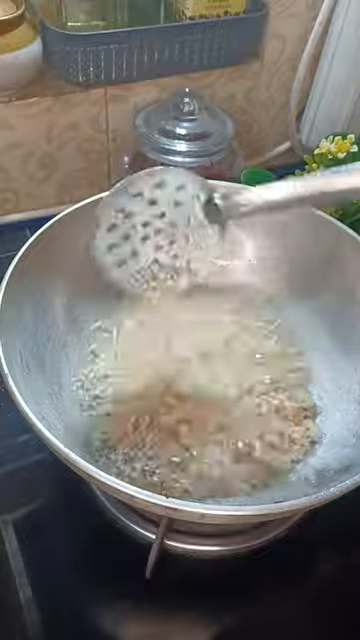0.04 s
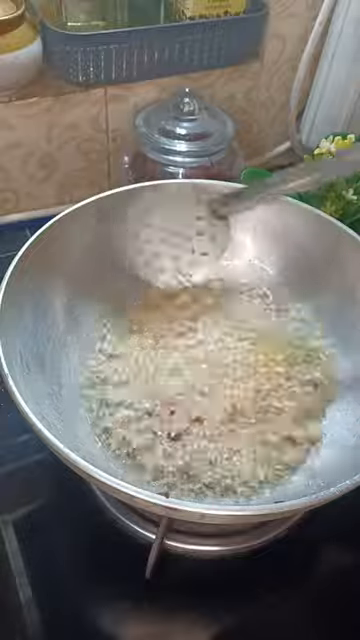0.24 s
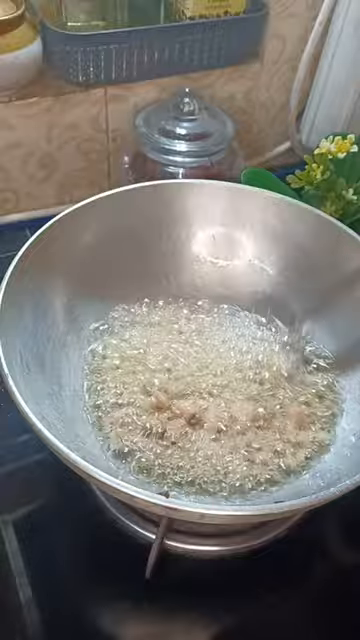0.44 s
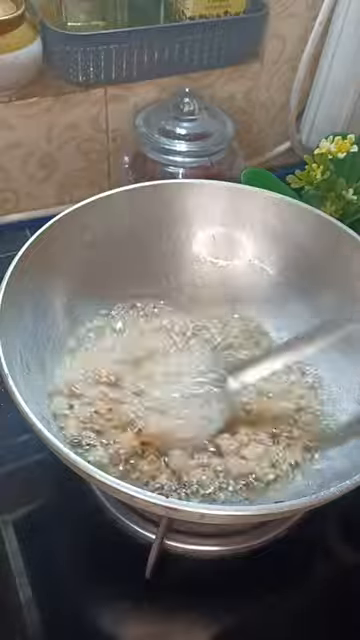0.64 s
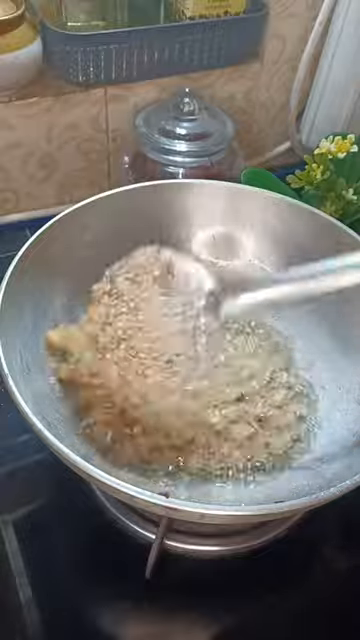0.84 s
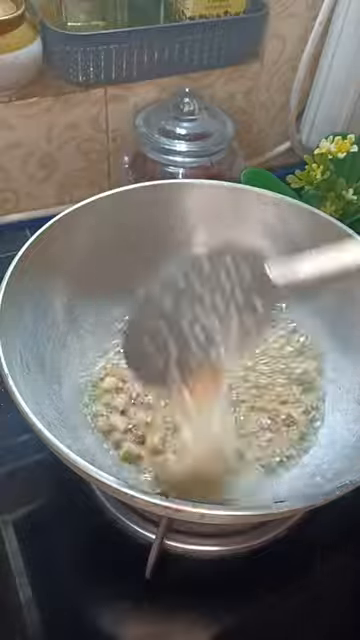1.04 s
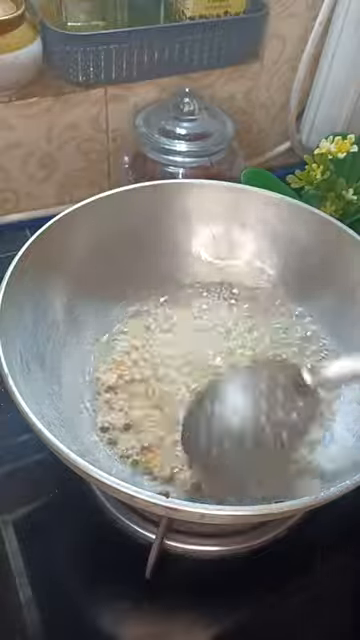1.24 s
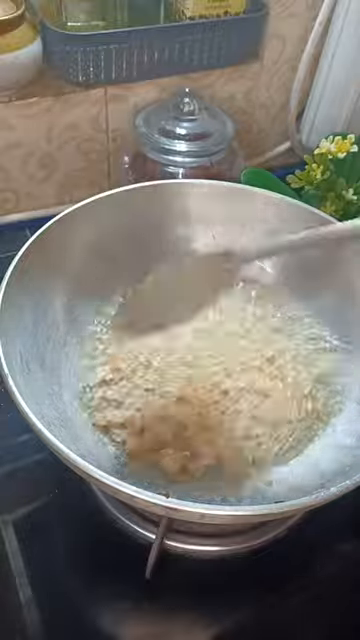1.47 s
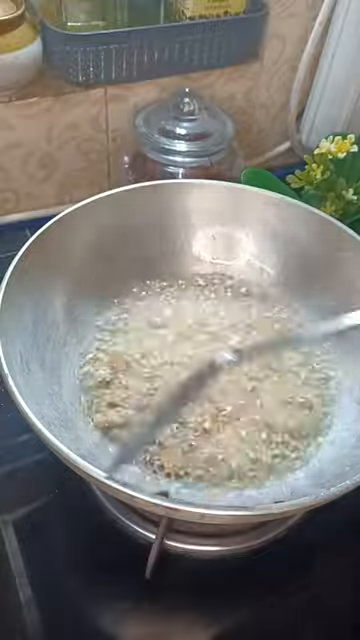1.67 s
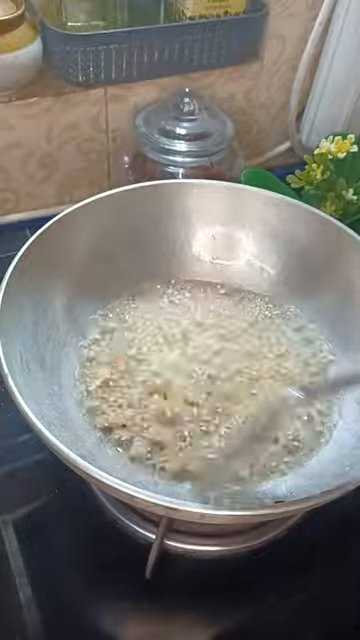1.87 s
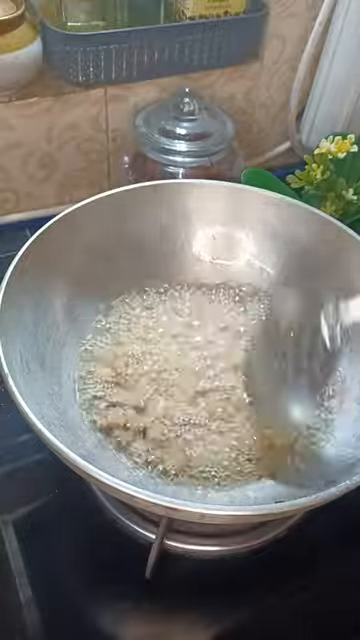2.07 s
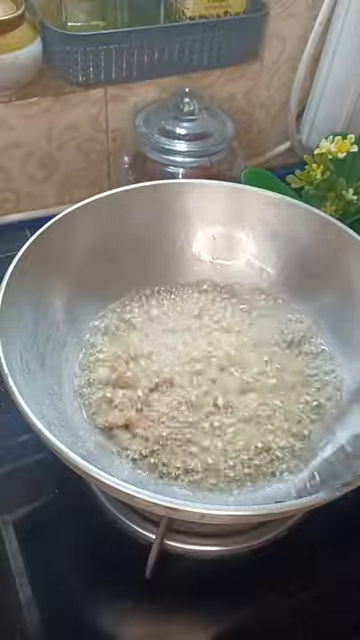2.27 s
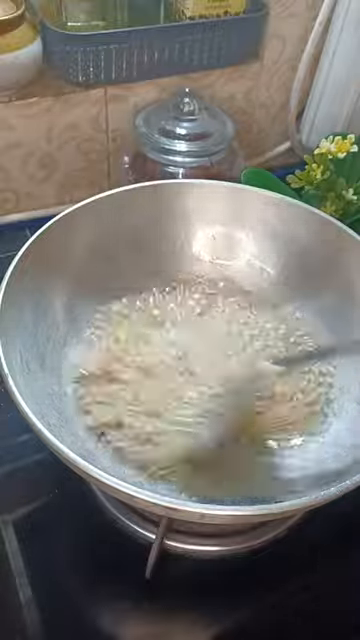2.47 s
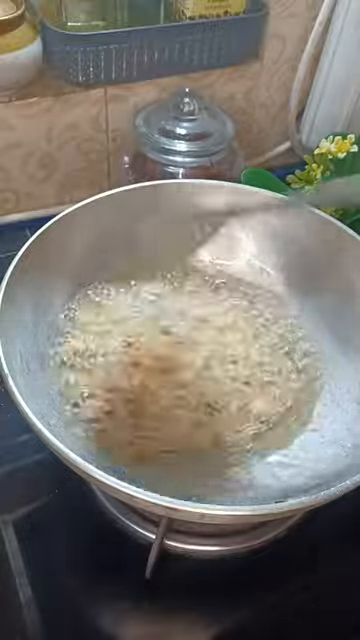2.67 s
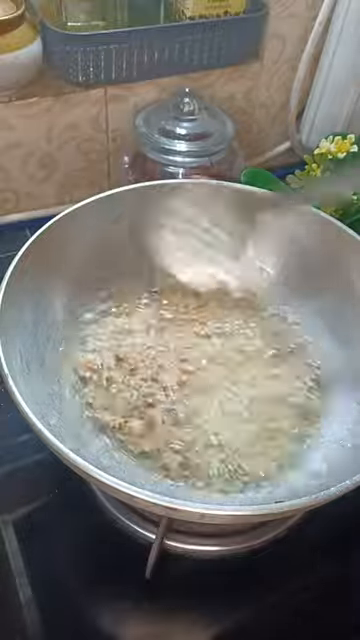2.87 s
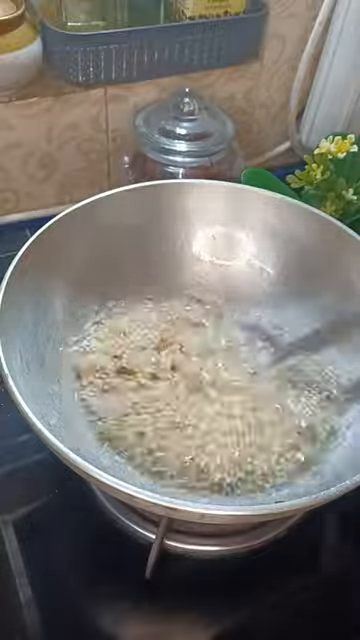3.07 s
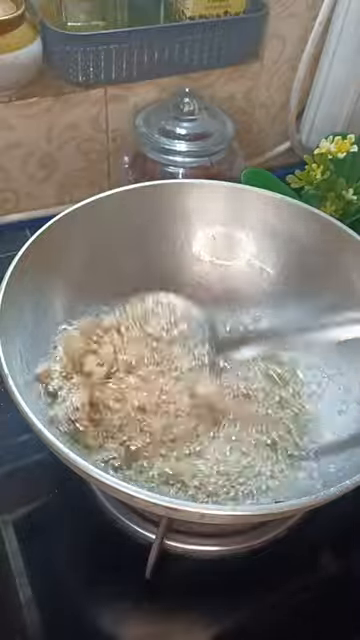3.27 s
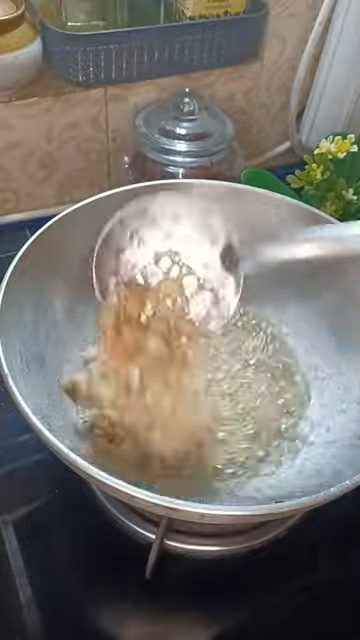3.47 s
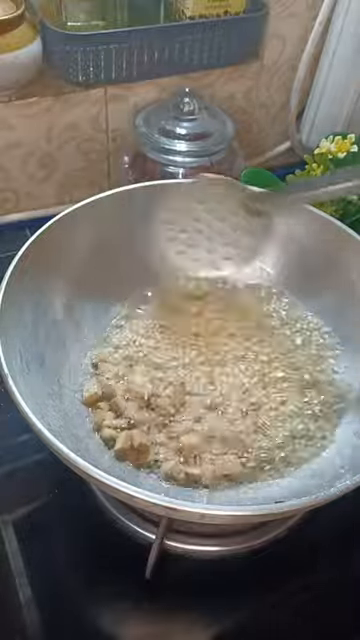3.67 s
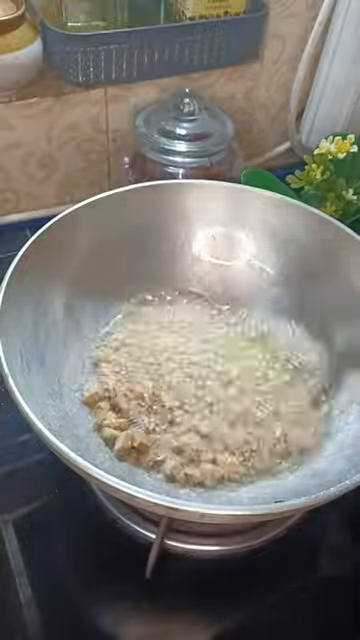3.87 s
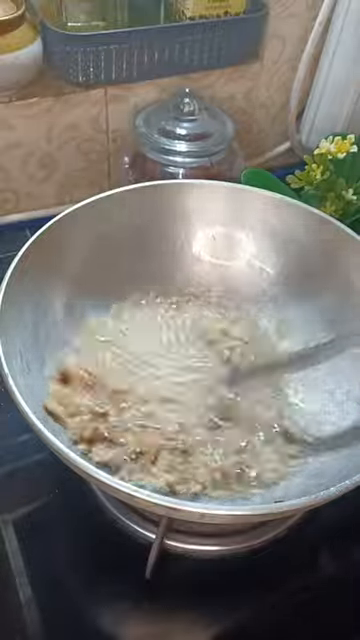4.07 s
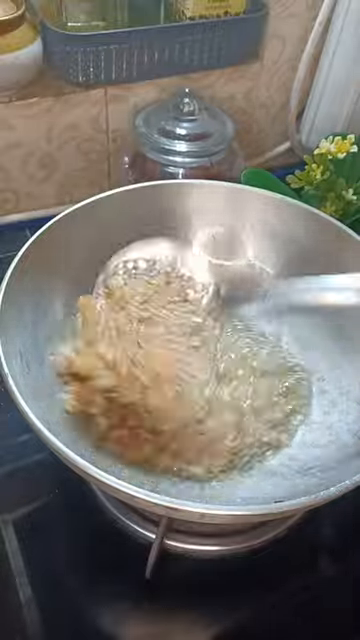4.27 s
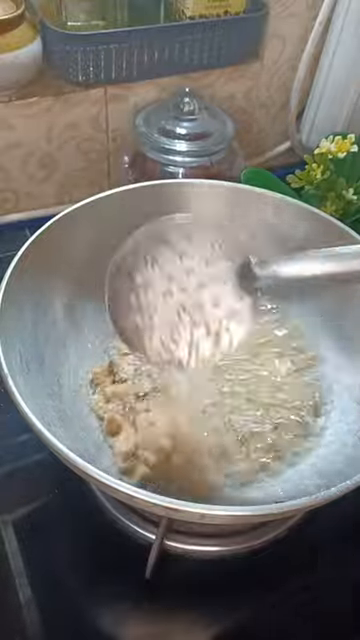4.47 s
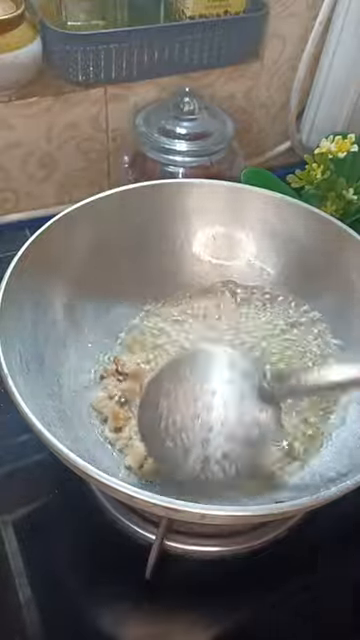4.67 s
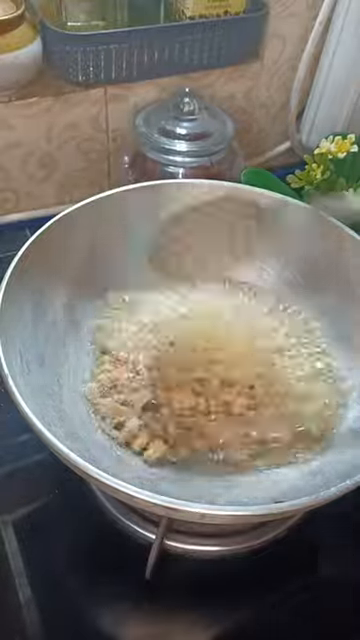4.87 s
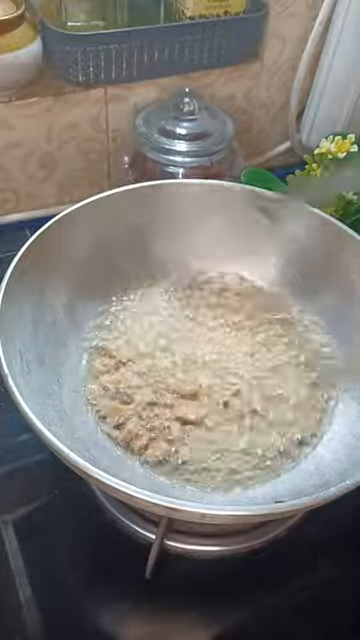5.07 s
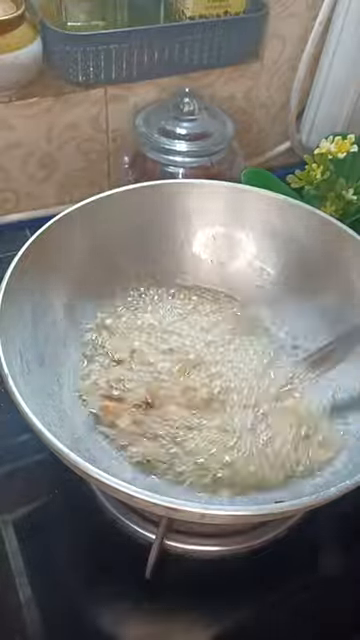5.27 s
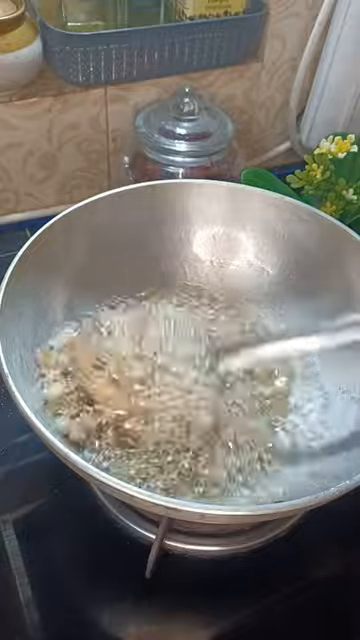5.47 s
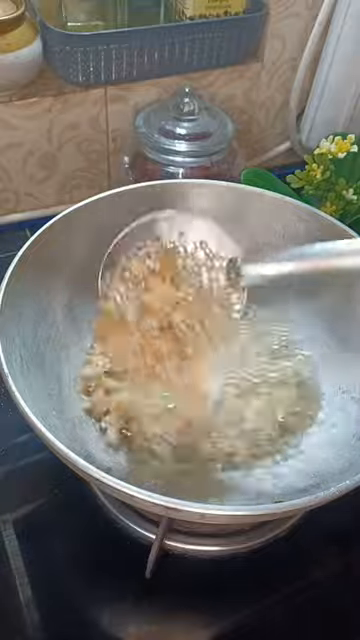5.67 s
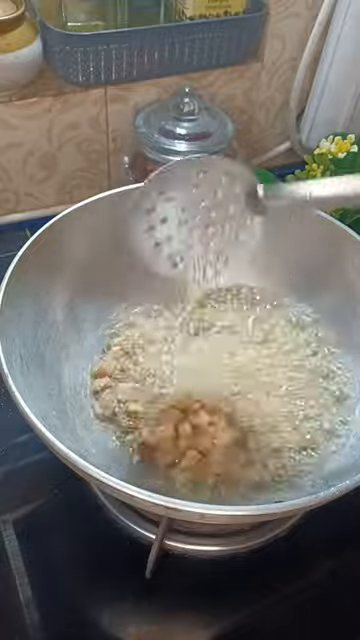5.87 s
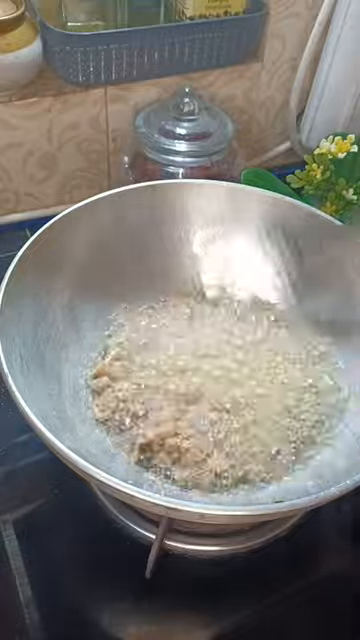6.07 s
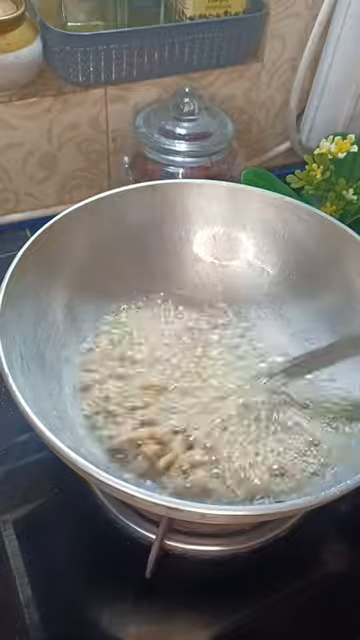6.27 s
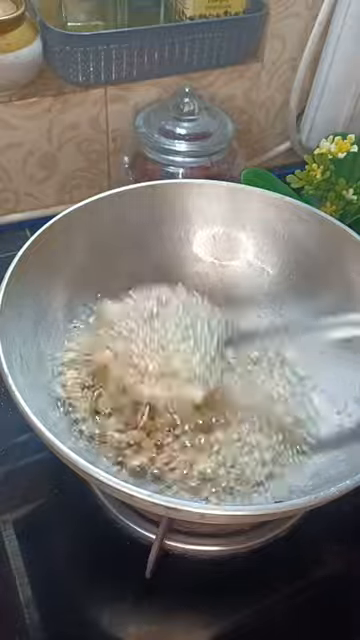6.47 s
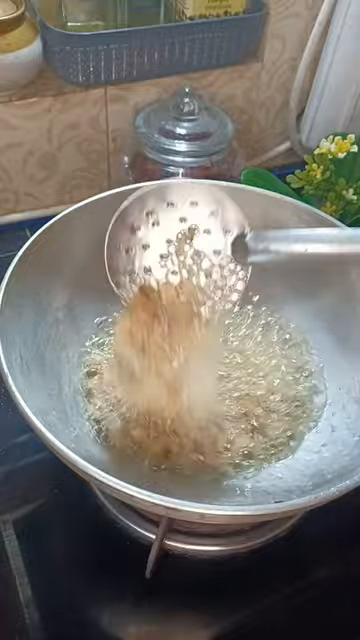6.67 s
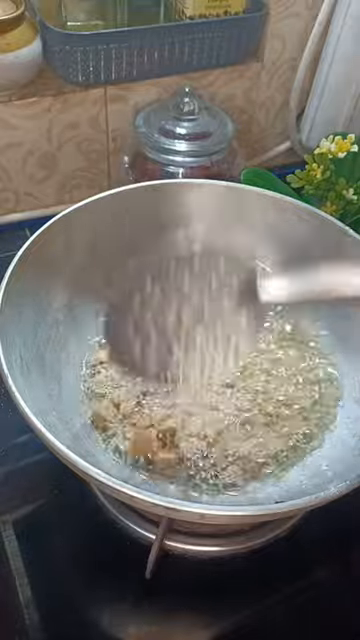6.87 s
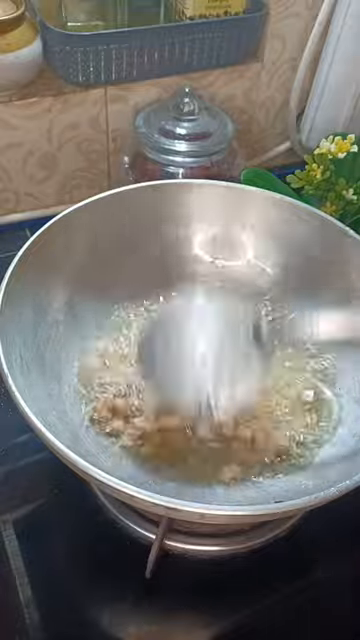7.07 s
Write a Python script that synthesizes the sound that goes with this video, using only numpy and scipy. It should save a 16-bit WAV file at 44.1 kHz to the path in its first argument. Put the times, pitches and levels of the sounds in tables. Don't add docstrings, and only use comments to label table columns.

```python
import sys
import numpy as np
from scipy import signal
from scipy.fft import rfft, irfft, next_fast_len
from scipy.io import wavfile

SR = 44100
rng = np.random.default_rng(int(sys.argv[2]) if len(sys.argv) > 2 else 0)


def to_wav(s):
    ch = np.atleast_2d(s).T
    pcm = np.round(np.clip(ch, -1, 1) * 32767)
    wavfile.write(sys.argv[1], SR, pcm.astype(np.int16))


def rack_gain(trim_db):
    fader = np.asarray(trim_db, float)
    return 10 ** (fader / 20)


N = 313938

# t/s, peak level/dB, favoured mode f/Hz, chatter time/ms, left lead/samples
KNOCKS = [(0.4196, -6, 4580, 3, 5.3), (1.3975, 0.6, 5122, 5.6, 1.5), (1.916, -46.5, 2210, 6.4, 2),
          (2.5285, -10.5, 7100, 2.3, 5), (3.031, -5, 6850, 2, 4.55), (3.155, -14.5, 12000, 0.83, 4),
          (3.933, -4, 5370, 3.9, 6), (4.8626, -2, 7200, 1.16, 2.5), (5.2034, -13, 7580, 2.4, 4.2),
          (5.3027, -15.5, 4900, 4.7, 4.6), (6.2385, -11, 4900, 2.2, 5.9)]
# bowl hum/dB, wall knock/dB, edge crack/dB, top crack/dB, strongest pair/dB
KNOCK_COLOUR = [(-29.5, -39, -30, -1.5, 12.5), (-37, -29.5, -17, -3.5, 3.5), (-5, 7, -19, -18, 6),
                (-25.5, -36, -7, 0.5, -18), (-23, -32, -39, -4.5, 0.5), (-40, -21, -14.5, 1.5, 1.5),
                (-26, -33, -45, -3, -1), (-24, -18, -12, -4, -14.5), (-26, -22, -41, 10, -11),
                (-34, -42, -38, -20, -1), (-29, -25.5, -29, 0, 4)]
# level/dB, skid above it/dB, hold/s, brightness/dB, oil splash/dB
SLIDES = [(-35, 3.5, 0.18, -10, -39), (-41, 23.5, 0.13, 0, -22.5), (-63.5, 17.5, .02, -9, -48),
          (-40.5, 13, 0.11, -0.5, -43), (-33.5, 13, 0.13, -6, -71), (-50.5, 5, 0.24, -6, -54),
          (-36.5, 19, 0.22, -10, -45), (-41, 6.5, 0.065, 10, -24), (-33, 9.5, 0.11, -4.5, -56),
          (-42, -4, 0.21, -28, -63), (-35, 15, 0.16, -4.5, -54)]
# t/s, level/dB, rise/s, hold/s, brightness/dB
DRAGS = [
    (1.19, -55, .05, 0.037, 3),
    (2.015, -39, .14, 0.022, -0.5),
    (5.92, -65, 0.3, .06, -2.5),
]
# t/s, level/dB, hold/s, fall/(dB/s), surge of oil against the hum/dB
ROCKS = [(0.418, -43, 0.0092, 230, -12), (1.29, -55, 0.075, 600, -12), (1.4, -36.5, 0.05, 135, -11.5),
         (1.91, -43.5, 0.21, 193, -29), (2.534, -43, 0.13, 172, -20.5), (3.035, -35, 0.021, 300, -16),
         (3.139, -36.5, 0.1, 123, -18.5), (3.937, -37, 0.018, 133, -17), (4.868, -28.5, .005, 97, -17.5),
         (5.194, -31, 0.052, 400, -18.5), (5.31, -48, 0.12, 302, -18), (6.023, -65, 0.042, 300, -15),
         (6.234, -40.5, 0.27, 114, -12.5)]
# t of the height/s, level/dB, rise/s, fall/(dB/s)
PUSHES = [(.46, -56, 0.02, 230), (.61, -33.5, 0.095, 195), (.74, -47, 0.087, 200), (1.27, -52, 0.073, 150),
          (1.85, -47.5, 0.022, 150), (2.18, -41.5, 0.31, 172), (2.59, -49, 0.073, 64),
          (2.69, -35, 0.14, 400), (3.075, -50, 0.017, 47), (3.235, -30.5, 0.038, 102),
          (3.98, -45.5, 0.03, 160), (4.06, -37.5, 0.068, 160), (4.19, -38, 0.055, 120),
          (5.461, -28.5, 0.17, 122), (6.02, -47, .07, 124), (6.288, -35.5, 0.026, 150),
          (6.396, -31, 0.04, 138), (6.518, -50, 0.055, 222)]
# f/Hz, level/dB, t60/s
BOWL_MODES = [(262, -10, .05), (378, -10, .07), (430, -13, .05), (535, -9, .08), (645, -9, .06),
              (740, 3, .04), (815, 1, .06), (1360, -5, .04), (1450, -5, .16), (1700, -4, .08),
              (2208, -7, .2), (2450, -13, .04)]
# f/Hz, level/dB, t60/s
SKIMMER_MODES = [(2700, -8, .045), (3137, -4, .06), (3500, -6, .035), (3850, -4, .04), (4390, -3, .07),
                 (4668, -5, .07), (4900, -3, .06), (5122, -1, .12), (5680, -7, .04), (6055, -6, .05),
                 (6546, -9, .04), (6850, -8, .04), (7137, -4, .05), (7579, -4, .045), (8400, -10, .03),
                 (9000, -9, .03), (10500, -6, .03), (11250, -7, .03), (11800, -7, .03), (12264, -7, .05),
                 (12950, -6, .03), (13251, -7, .035), (13550, -8, .04)]
# low f/Hz, high f/Hz
PAIR_HZ = (4800, 5250)
BANDS_HZ = {"thud": (200, 500), "wall": (600, 2000), "edge": (2000, 4000), "scrape": (4000, 8500),
            "bright": (9800, 17500), "surge": (70, 190)}
# t/s, peak level/dB, bubble f/Hz, left against right/dB
SPITS = [(0.0355, -31.5, 5100, 11), (0.7771, -21, 12800, 2), (0.8215, -35.5, 3740, 15.5),
         (0.925, -36, 8500, 1), (1.0907, -30, 3280, 15.5), (1.18, -27, 5000, 3), (1.236, -31, 8300, 3),
         (1.7867, -30, 7100, 8), (1.7907, -24.5, 4030, 6.5), (1.822, -13.5, 4000, 3.5),
         (2.954, -36.5, 2700, 12), (4.2483, -24.5, 7040, 8), (4.2862, -31, 7900, 12),
         (4.314, -24.5, 7660, 9), (4.6973, -23, 7850, 6.5), (4.73, -15.5, 11900, -6),
         (4.8278, -31.5, 3100, 8), (5.0282, -15.5, 12700, 0), (5.1791, -32, 2820, 4),
         (5.986, -18.5, 10600, 3.5), (7.059, -15.5, 13500, 4.5)]
# t/s, level/dB
VIGOUR = [(0.0, -47.5), (0.38, -50.5), (1.4, -47), (1.58, -50.5), (2.1, -50), (2.33, -53.5), (3.25, -45),
          (3.36, -49), (3.98, -46.5), (4.08, -47), (5.25, -47.5), (5.39, -41.5), (5.54, -46.5), (6.28, -49),
          (6.42, -47), (7.11, -47.5)]
# f/Hz, density/(dB per Hz)
FIZZ = [(290, -46), (500, -16), (546, -10.5), (651, -29), (1150, 17), (1260, 1.5), (1350, 2), (2260, -1.5),
        (2650, 3.5), (7600, -9.5), (13100, -7), (15800, -8.5), (16500, -27)]
# f/Hz, density/(dB per Hz)
HOUSE = [(18, -46), (30, -15), (102, -0.5), (279, -3), (321, -1.5), (473, -36), (543, 0), (600, -1),
         (780, -31), (1320, -120)]
# f/Hz, likeness/1
LIKENESS = [(60, 0.58), (180, 0.7), (550, 0.86), (1650, 0.15), (4970, 0.21), (15000, 0.021)]

HUM_HZ = 316.7
TICK_DB, RING_DB = -5.5, -3.8
PAIR_TURN = 1.7
ROCK_RISE_S, SLIDE_RISE_S = 0.019, .003
SKID_FALL_DB_S, EASE_DB_S, LIFT_DB_S, SPLASH_FALL_DB_S = 546, 34.5, 167, 173
HOUSE_DB, LOW_FIZZ_DB, BRIGHT_FIZZ_DB = -71, -47.5, -45
LOW_FIZZ_FOLLOWS = 0.21
KITCHEN_T60_S, WALL_CUT_HZ = 0.42, 7000
MIC_TOP_HZ, MIC_TOP_DB = 15900, 26


def metal(hum, scrape, bright, churn):
    runs = chatter()
    grit = grains(2200 * rack_gain(4.5 * drift(33)), 2.2)[0]
    grit = np.array([grit, np.roll(grit, 5)])
    edge = np.sqrt(churn * scrape)
    out = bowl_hum(hum) + ringing_modes(runs, grit, hum, churn, edge, scrape, bright)
    out = out + crack_and_rasp(runs, grit, hum, churn, edge, scrape, bright)
    return above(out, 245)


def bowl_hum(hum):
    phase = np.cumsum(HUM_HZ + 5 * drift(12)) * 2 * np.pi / SR
    return hum * rack_gain(-3.5 + 2.4 * drift(25)) * np.sin(phase) * rack_gain([[-.2], [.2]])


def ringing_modes(runs, grit, hum, churn, edge, scrape, bright):
    _, peak_db, loved_hz, *_ = np.transpose(KNOCKS)
    hum_db, wall_db, edge_db, top_db, pair_db = np.transpose(KNOCK_COLOUR)
    run_db = 20 * np.log10(abs(rfft(runs, 8192)) + 1e-6)
    zone_hz = [900, 2000, 4000, 8500]
    blows_db = [hum_db, wall_db, edge_db + RING_DB - 1, RING_DB - 13.5, top_db + RING_DB - 6]
    drags = [hum * rack_gain(-17), churn * rack_gain(-12.5), edge * rack_gain(-8.5), scrape * rack_gain(-12), bright * rack_gain(-9)]
    out = np.zeros((2, N))
    for k, (hz, level_db, t60) in enumerate(BOWL_MODES + SKIMMER_MODES):
        zone = np.searchsorted(zone_hz, hz)
        in_pair = PAIR_HZ[0] < hz < PAIR_HZ[1]
        loved_db = 7 * np.exp(-(np.log(hz / loved_hz) / .03) ** 2) + pair_db * in_pair
        luck_db = rng.normal(0, 2.5, len(KNOCKS)) - np.clip(run_db[:, round(hz / SR * 8192)], -12, 12)
        blow_db = peak_db + blows_db[zone] + loved_db + level_db + luck_db
        wander = drift(8.4, lambda v: rack_gain(level_db + 10.8 * np.tanh(v)))
        drag = drags[zone] * wander * np.sqrt(28 / (t60 * SR))
        drive = add_knocks(drag * grit, runs, blow_db)
        drive = drive * (-1) ** k
        turn = rng.normal(0, 3.06) * min(hz / 2000, 1)
        if in_pair:
            turn = PAIR_TURN
        pan_db = rng.normal(0, 0.23) - hz / 3800
        left = ring(drive[0], hz, t60) * rack_gain(pan_db / 2)
        right = ring(drive[1], hz, t60, turn) * rack_gain(-pan_db / 2)
        out += [left, right]
    return out


def crack_and_rasp(runs, grit, hum, churn, edge, scrape, bright):
    peak_db = np.transpose(KNOCKS)[1]
    hum_db, wall_db, edge_db, top_db, _ = np.transpose(KNOCK_COLOUR)
    rough = grit + 0.8 * rng.standard_normal((2, N))
    layers = [("thud", hum_db + 2, hum * rack_gain(-16.5)),
              ("wall", wall_db + 30.5, churn * rack_gain(-4.0)),
              ("edge", edge_db + 29.0, edge * rack_gain(6.5)),
              ("scrape", 3, scrape * rack_gain(-0.5)),
              ("bright", top_db + 1.5, bright * rack_gain(0.5))]
    out = np.zeros((2, N))
    for name, crack_db, rasp in layers:
        uneven = drift(19, lambda v: rack_gain(3.5 * np.tanh(v)))
        drive = add_knocks(rasp * uneven * rough, runs, peak_db + crack_db)
        facing = -1 if name in ("wall", "scrape") else 1
        out += facing * band(drive, *BANDS_HZ[name])
    return out


def chatter():
    runs = []
    for *_, ms, lead in KNOCKS:
        t = np.arange(2048) / SR * 1000 / max(ms, 1)
        run = rng.standard_normal(2048) ** 3 * np.sqrt(t) * np.exp(-t)
        run = run / np.sqrt(np.sum(run ** 2))
        run[0] = rack_gain(TICK_DB)
        runs.append(run)
    return runs


def add_knocks(drive, runs, levels_db):
    levels_db = np.broadcast_to(levels_db, len(KNOCKS))
    for (s, *_, lead), run, db in zip(KNOCKS, runs, levels_db):
        for ear in range(2):
            at = round(s * SR + ear * lead)
            drive[ear, at:at + len(run)] += rack_gain(db) * run
    return drive


def strokes():
    s, db, hold_s, fall, surge_db = np.transpose(ROCKS)
    hum = swells(s, db, ROCK_RISE_S, hold_s, fall)
    surge = swells(s, db + surge_db, ROCK_RISE_S, hold_s, fall)

    knock_s = np.transpose(KNOCKS)[0]
    slide_db, skid_db, slide_hold_s, slide_bright_db, splash_db = np.transpose(SLIDES)
    drag_s, drag_db, drag_rise_s, drag_hold_s, drag_bright_db = np.transpose(DRAGS)

    def dragging(up):
        slide_level_db = slide_db + up * slide_bright_db
        slide = swells(knock_s, slide_level_db, SLIDE_RISE_S, slide_hold_s, LIFT_DB_S, EASE_DB_S)
        skid = swells(knock_s, slide_level_db + skid_db, SLIDE_RISE_S, 0, SKID_FALL_DB_S)
        free = swells(drag_s, drag_db + up * drag_bright_db, drag_rise_s, drag_hold_s, LIFT_DB_S)
        return slide + skid + free

    s, db, rise_s, fall = np.transpose(PUSHES)
    pushed = swells(s - rise_s, db, rise_s, 0, fall)
    splashed = swells(knock_s, splash_db, SLIDE_RISE_S, 0, SPLASH_FALL_DB_S)
    return hum, dragging(0), dragging(1), pushed + splashed, surge


def oil(churn, surge):
    pitches = np.geomspace(700, 3400, 14)
    births = grains(500 * rack_gain(6 * drift(25)), 4.34, channels=2)
    dealt = rng.integers(0, 14, (2, N))
    common = rack_gain(-7 * np.log2(pitches / 1500) ** 2)
    ringing = sum(common[k] * ring(births * (dealt == k), hz, 8.3 / hz) for k, hz in enumerate(pitches))
    mid, side = above(ringing, 570)
    bubbles = rms_one(mid + 0.66 * side * [[1], [-1]])
    mid, side = band(band(rng.standard_normal((2, N)), *BANDS_HZ["surge"]), 99, 390)
    dull = rms_one(mid + 0.36 * side * [[1], [-1]])
    return churn * rack_gain(-9.5) * bubbles + surge * rack_gain(-4) * dull


def spits():
    out, t = np.zeros((2, N)), np.arange(1600) / SR
    click = 1. * (t == 0)
    sprays = rng.standard_normal((len(SPITS), 1600)) ** 3
    for (s, peak_db, hz, pan_db), spray in zip(SPITS, sprays):
        bubble = np.sin(2 * np.pi * hz * t * (.93 + .008 * hz * t)) * rack_gain(-2.2 * hz * t)
        sputter = 0.056 * spray * rack_gain(-1200 * t)
        pop = bubble + band(2.9 * click + sputter, 0.64 * hz, 1.5 * hz) + 0.047 * click
        for ear in range(2):
            at = round(s * SR) + ear
            level_db = peak_db - 5.0 - 0.00017 * hz + pan_db * (1.0 - ear)
            out[ear, at:at + len(pop)] += rack_gain(level_db) * pop
    return above(out, 690)


def frying(patchy_db=.7):
    vigour_db = in_time(VIGOUR)
    swing_db = vigour_db - np.mean(vigour_db)
    crowd = grains(14000, 0.63, channels=4).reshape(2, 2, N)
    house, low, high = out = np.zeros((3, 2, N))
    together = drift(3)
    edges = 30 * 2 ** np.arange(0, 9.4, .4)
    for k, (low_hz, high_hz) in enumerate(zip(edges, edges[1:])):
        mid, side = band(crowd[k % 2], low_hz, high_hz)
        hz = np.sqrt(low_hz * high_hz)
        alike = np.clip(at_hz(LIKENESS, hz), -1, 1)
        patches_db = patchy_db * (.3 * together + drift(20))
        gain = rack_gain(at_hz(FIZZ if hz > 500 else HOUSE, hz) + patches_db)
        layer = int(hz > 500) + int(hz > 4500)
        out[layer] += gain * (np.sqrt(1 + alike) * mid + np.sqrt(1 - alike) * side * [[1], [-1]])
    low = rms_one(low) + rack_gain(-12) * rms_one(ring(rms_one(low) * 1., 790, .015))
    return (rack_gain(HOUSE_DB) * rms_one(house)
            + rack_gain(LOW_FIZZ_DB + LOW_FIZZ_FOLLOWS * swing_db) * low
            + rack_gain(BRIGHT_FIZZ_DB + swing_db) * rms_one(high))


def kitchen(x):
    size = next_fast_len(N + SR)
    w, heard = np.linspace(0, np.pi, size // 2 + 1), rfft(x.mean(0), size)
    dull = 1 / np.sqrt(1 + (w * SR / (2 * np.pi * WALL_CUT_HZ)) ** 2)
    per_sample = np.log(rack_gain(-60 / SR / KITCHEN_T60_S) * dull ** (1 / 4000)) - 1j * w
    out = np.zeros((2, len(w)), complex)
    for k, lag in enumerate((rng.uniform(.006, .03, 16) * SR).astype(int)):
        loop = np.exp(lag * per_sample)
        out[k % 2] += loop / (1 - loop) * (-1) ** (k // 2)
    return irfft(out * heard, size)[:, :N]


def swells(start_s, level_db, rise_s, hold_s, fall_db_s, ease_db_s=0.):
    t = np.arange(0, N + 32, 32)[:, None] / SR - start_s
    past = np.clip(t - rise_s, 0, None)
    fallen_db = ease_db_s * past + fall_db_s * np.clip(past - hold_s, 0, 3)
    gains = np.clip(t / rise_s, 0, 1) * rack_gain(level_db - fallen_db)
    return np.interp(np.arange(N) / 32, np.arange(len(t)), gains.sum(1))


def grains(per_s, spread_db, channels=1):
    chance, size, sign = rng.random((3, channels, N))
    born, out = chance < per_s / SR, np.zeros((channels, N))
    size_db = spread_db * np.minimum(-np.log(1 - size[born]), 5)
    out[born] = rack_gain(size_db) * np.sign(sign[born] - .5)
    return rms_one(out)


def ring(clicks, hz, t60, turn=0.):
    r, w = rack_gain(-60 / (t60 * SR)), 2 * np.pi * hz / SR
    return signal.lfilter([np.sin(turn), r * np.sin(w - turn)], [1, -2 * r * np.cos(w), r * r], clicks + 1e-18)


def drift(rate, shape=np.asarray):
    r = np.exp(-80 * np.pi * rate / SR)
    slow = signal.lfilter([1], [1, -2 * r, r * r], rng.standard_normal(N // 40 + 2002))[2000:]
    return np.interp(np.arange(N), np.arange(len(slow)) * 40, shape(rms_one(slow)))


def rms_one(x):
    return x / np.sqrt(np.mean(x ** 2) + 1e-20)


def in_time(rows):
    return np.interp(np.arange(N) / SR, *np.transpose(rows))


def at_hz(points, hz):
    points_hz, values = np.transpose(points)
    return np.interp(np.log(hz), np.log(points_hz), values)


def band(x, low_hz, high_hz):
    return signal.sosfilt(signal.butter(2, [low_hz, min(high_hz, .45 * SR)], "band", fs=SR, output="sos"), x)


def above(x, cut_hz):
    return signal.sosfilt(signal.butter(3, cut_hz, "high", fs=SR, output="sos"), x)


def scene():
    hum, scrape, bright, churn, surge = strokes()
    near = metal(hum, scrape, bright, churn) + oil(churn, surge) + spits()
    return near + rack_gain(-20) * kitchen(near) + frying()


def low_pass(x):
    return signal.sosfilt(signal.butter(12, 16810, fs=SR, output="sos"), x)


def record(dry):
    rounded = np.tanh(dry) * .95
    top_cut = signal.cheby2(10, MIC_TOP_DB, MIC_TOP_HZ, fs=SR, output="sos")
    return low_pass(signal.sosfilt(top_cut, rounded))


dry = scene()
out = record(dry)
to_wav(out)
```